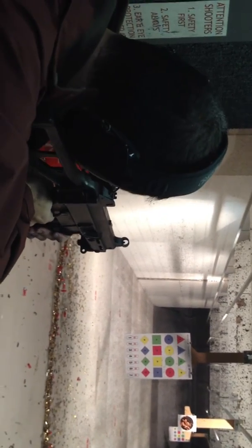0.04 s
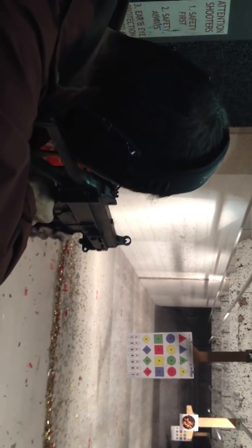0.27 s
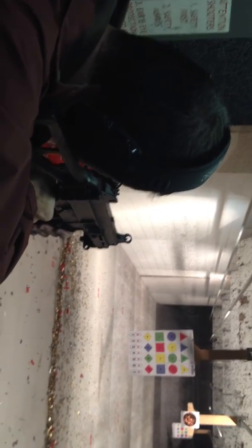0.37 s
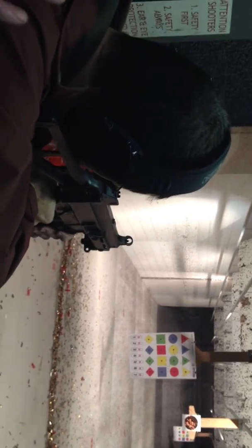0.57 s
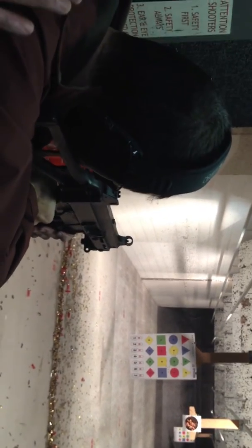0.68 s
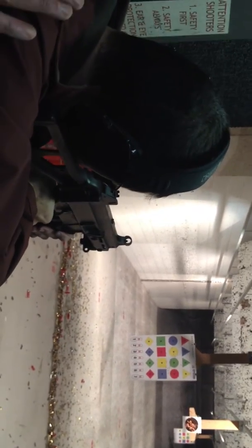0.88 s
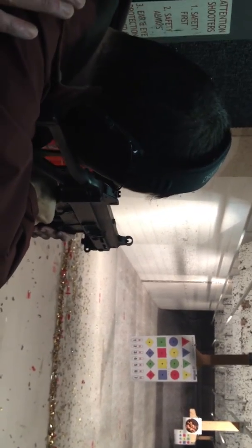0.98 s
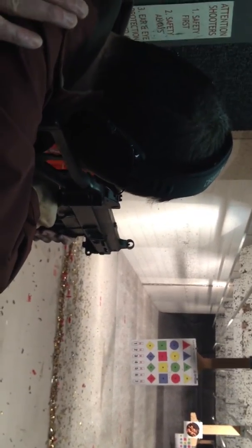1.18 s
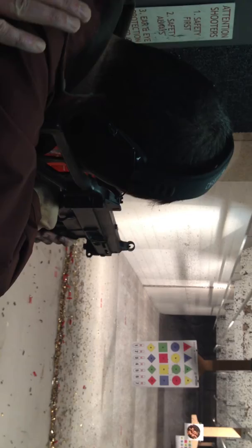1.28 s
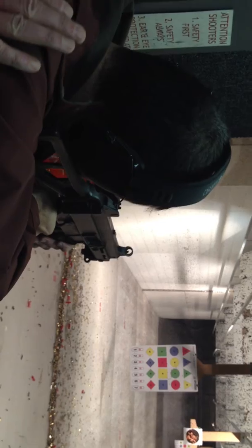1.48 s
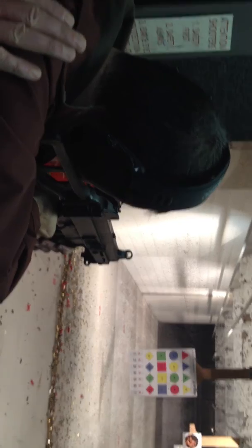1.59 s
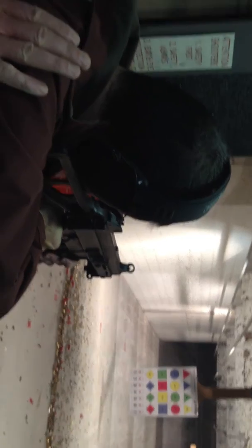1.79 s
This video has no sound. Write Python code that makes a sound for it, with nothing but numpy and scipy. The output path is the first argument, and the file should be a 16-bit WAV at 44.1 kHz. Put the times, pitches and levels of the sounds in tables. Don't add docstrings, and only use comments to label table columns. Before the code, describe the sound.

Low ventilation roar, then a very fast double gunshot just ahead of the microphone, distorted and loud, its bassy echo rolling down a long indoor range before a small brass case ticks on concrete.

```python
import sys
import numpy as np
from scipy import signal
from scipy.fft import rfft, irfft
from scipy.io import wavfile
from scipy.ndimage import uniform_filter1d

SR = 44100
rng = np.random.default_rng(int(sys.argv[2]) if len(sys.argv) > 2 else 0)


def put_to_file(sound):
    columns = np.atleast_2d(sound).T
    safe = np.clip(columns, -1, 1)
    whole_steps = np.round(safe * 32767)
    wavfile.write(sys.argv[1], SR, whole_steps.astype(np.int16))


def field_ratio(decibels):
    return 10 ** (np.asarray(decibels, dtype=float) / 20)


N = 81585
T = np.arange(N) / SR
BANDS_HZ = 60 * 2 ** np.arange(0, 8.1, 1 / 3)

# t/s, booth level/dB, direct blast level/dB, booth ring held/s
SHOTS = [
    (.2343, 0, 0, .05),
    (.3378, 0, -3, .01),
]


def read(table, hz):
    table_hz, value = np.transpose(table)
    return np.interp(np.log(hz), np.log(table_hz), value)


def split(colour):
    f = np.maximum(np.fft.rfftfreq(N, 1 / SR), 1)
    spectrum = rfft(rng.standard_normal(N)) * field_ratio(read(colour, f))
    bands_from_centre = 3 * np.log2(f / BANDS_HZ[:, None])
    share = np.cos(np.pi / 2 * np.clip(bands_from_centre, -1, 1)) ** 2
    bands = irfft(spectrum * share, N)
    return bands / np.std(bands.sum(0))


def walk(rate):
    k = int(SR / rate)
    steps = np.repeat(rng.standard_normal(N // k + 1), k)
    smooth = uniform_filter1d(uniform_filter1d(steps, k), k)
    return 1.3 * smooth[:N]


def swell(start, rise, t60, hold=0):
    u = np.maximum(T - start, 0)
    decay = field_ratio(-60 * np.maximum(u - hold, 0) / t60)
    return (1 - np.exp(-u / max(rise, 1e-4))) * decay


def blast():
    # delay/s, length/s (negative: inverted, ends at delay), level/dB
    images = [(.0003, .0011, 2), (.0014, .0005, 1), (.0033, -.0014, -3), (.0027, .0008, -2)]
    out = np.zeros(N)
    for s, _, db, _ in SHOTS:
        for lag, length, image_db in images:
            u = (T - s - lag) / length
            n_wave = np.where((u > 0) & (u < 1), 1 - 2 * u, 0)
            out += field_ratio(db + image_db) * n_wave
    return uniform_filter1d(out, size=4)


def booth():
    # f/Hz, spectral level/dB per Hz
    booth_colour = [(35, -60), (150, -22.5), (400, -5), (1100, 1.5), (3400, -2.5), (6700, -7),
                    (15500, -17.5)]
    lags_s = (.003, 0)
    power = 0
    for (s, db, _, hold), lag in zip(SHOTS, lags_s):
        power = power + (field_ratio(db) * swell(s + lag, .0008, .07, hold)) ** 2
    return field_ratio(2.0 * walk(300)) * np.sqrt(power) * split(booth_colour).sum(0)


def lane():
    # f/Hz, spectral level/dB per Hz
    lane_colour = [(53, -52), (90, -29.5), (164, -5), (372, -2), (525, -4), (598, -5), (2130, -10.5),
                   (6800, -24.5), (15400, -42.5)]
    # f/Hz, t60/s
    lane_t60 = [(100, 1.3), (250, 1.27), (600, 0.95), (1500, 0.9), (4000, 0.68), (8000, 0.57),
                (14000, 0.51)]
    # t/s, rise/s, level/dB, tilt/dB per octave above 1.5 kHz
    returns = [
        (.272, 0.012, -5, 2.5),
        (0.343, 0.0031, -4, 1.5),
        (0.401, 0.065, -12, 3),
        (.51, .015, -28, 0),
    ]
    out = np.zeros(N)
    for hz, band in zip(BANDS_HZ, split(lane_colour)):
        octaves = max(np.log2(hz / 1500), 0)
        t60 = read(lane_t60, hz)
        power = 0
        for s, rise, db, tilt_db in returns:
            power = power + (field_ratio(db + tilt_db * octaves) * swell(s, rise, t60)) ** 2
        out += np.sqrt(power) * band * field_ratio(2.23 * walk(24.33))
    return out


def booms():
    # t/s, level/dB, lowest mode f/Hz, t60/s
    slaps = [
        (.289, 3.5, 179, 0.15),
        (.318, -7, 208.3, 0.16),
        (.394, -4.5, 160.8, 0.17),
        (0.514, -18.5, 160.6, 0.4),
        (.655, -15, 150.8, 0.53),
        (0.766, -30.5, 155.5, 0.27),
    ]
    # multiple of the lowest f, level/dB
    modes = [(1.0, -6.5), (1.35, -7), (1.75, 3), (2.2, 0.5), (2.8, -1.5)]
    out = np.zeros(N)
    for s, db, hz, t60 in slaps:
        for multiple, mode_db in modes:
            phase = 2 * np.pi * hz * multiple * (T - s) + 0.73 * walk(30)
            envelope = swell(s, 0.0022, t60 / np.sqrt(multiple))
            out += field_ratio(db + mode_db - 5) * envelope * np.sin(phase)
    return out


def case():
    # t/s, level/dB, t60/s
    bounces = [
        (1.182, -35, 0.14),
        (1.198, -51.5, .15),
        (1.213, -57, 0.21),
        (1.845, -54, .08),
    ]
    # f/Hz, spectral level/dB per Hz
    brass_colour = [(2500, -30), (4500, -4.5), (7500, -3.5), (11000, -11), (15000, -11.5)]
    envelope = sum(field_ratio(db) * swell(s, 0.0011, t60) for s, db, t60 in bounces)
    return envelope * field_ratio(2.5 * walk(500)) * split(brass_colour).sum(0)


def ventilation():
    # f/Hz, spectral level/dB per Hz
    air_colour = [(24, -92), (40, -49), (117, -8.5), (235, -3), (621, -15.5), (758, -14), (2990, -21),
                  (13000, -45.5), (15500, -51.5)]
    gust = walk(0.67)
    roar = sum(band * field_ratio(0.51 * gust + 0.93 * walk(11.83)) for band in split(air_colour))
    return field_ratio(-33.5) * roar


def scene():
    return (blast() + booth() + lane() + booms() + case() + ventilation())[None]


def overload(x):
    top, knee = 0.4, 2.7
    return x / (1 + np.abs(x / top) ** knee) ** (1 / knee)


def duck(x):
    start_s, fall_s, depth_db = 0.36, 0.13, -7.5
    hold_until_s, back_db_per_s = 0.75, 5.5
    fall = 1 - np.exp(-np.maximum(T - start_s, 0) / fall_s)
    recovery_db = back_db_per_s * np.maximum(T - hold_until_s, 0)
    gain_db = np.minimum(depth_db * fall + recovery_db, 0)
    body = signal.sosfilt(signal.butter(1, 5950, fs=SR, output="sos"), x)
    treble = x - body
    return (body + treble * field_ratio(0.5 * gain_db)) * field_ratio(gain_db)


def roll_off(x):
    return signal.sosfilt(signal.butter(12, 16460, fs=SR, output="sos"), x)


def record(dry):
    x = signal.sosfilt(signal.butter(3, 106.6, "high", fs=SR, output="sos"), dry)
    x = duck(overload(x))
    x = x + field_ratio(-72.5) * walk(51)
    x = signal.sosfilt(signal.ellip(10, .2, 60, 15350, fs=SR, output="sos"), x)
    return roll_off(x)


dry = scene()
out = record(dry)
put_to_file(out)
```